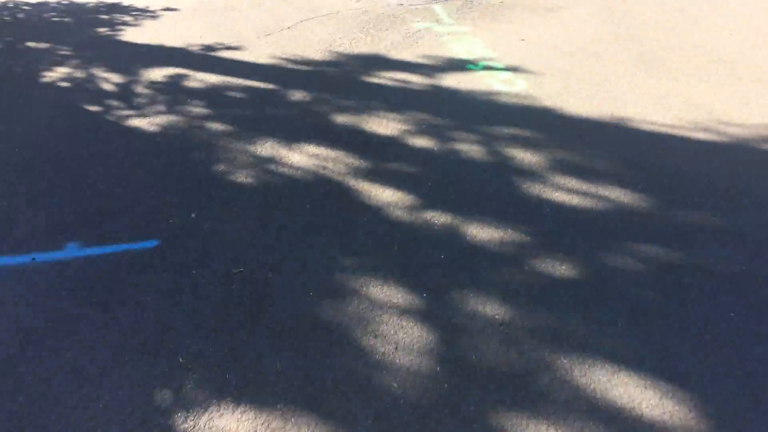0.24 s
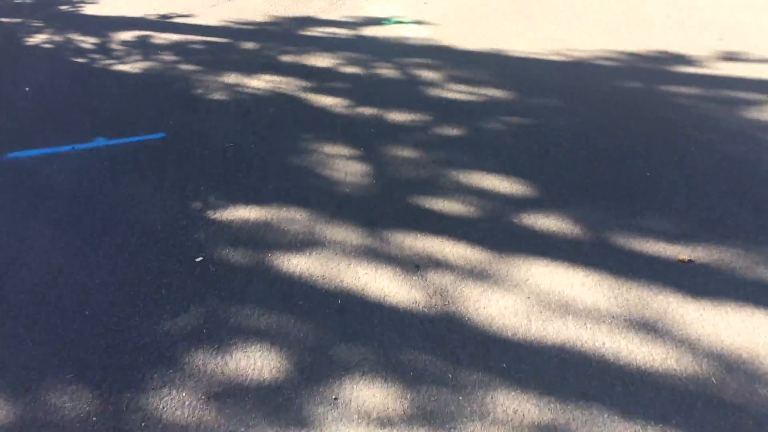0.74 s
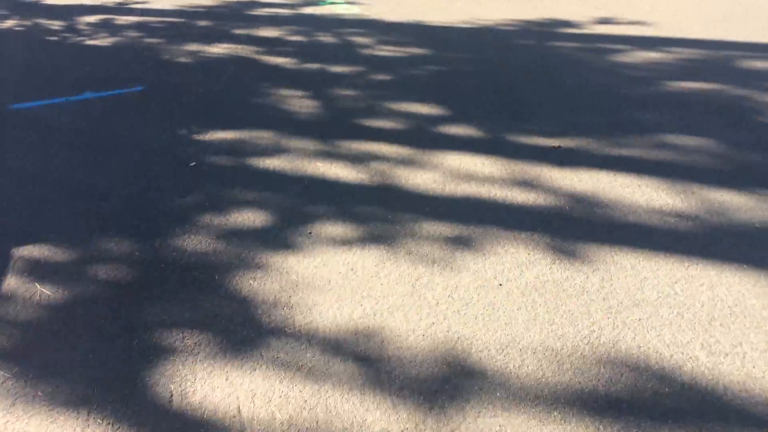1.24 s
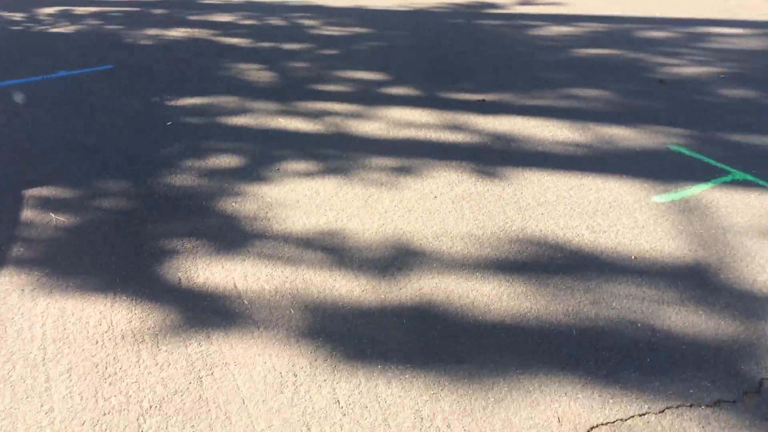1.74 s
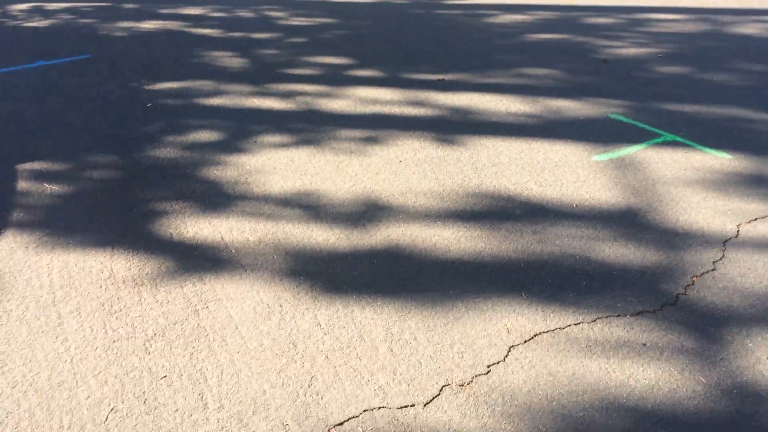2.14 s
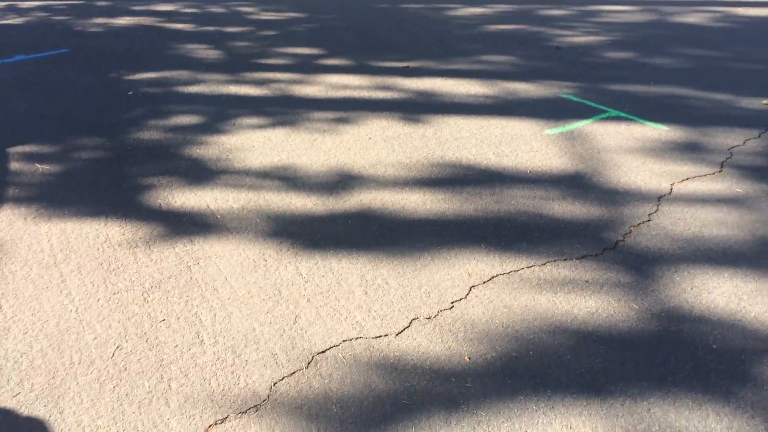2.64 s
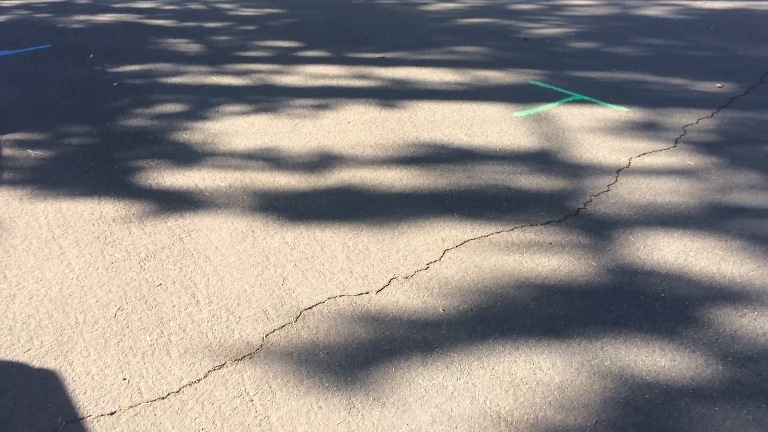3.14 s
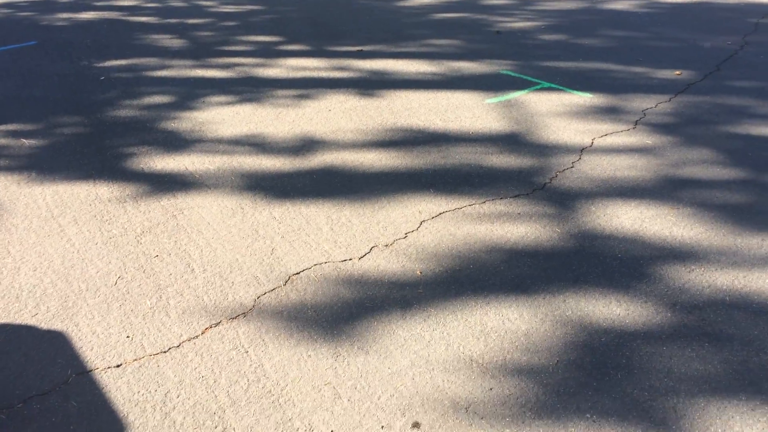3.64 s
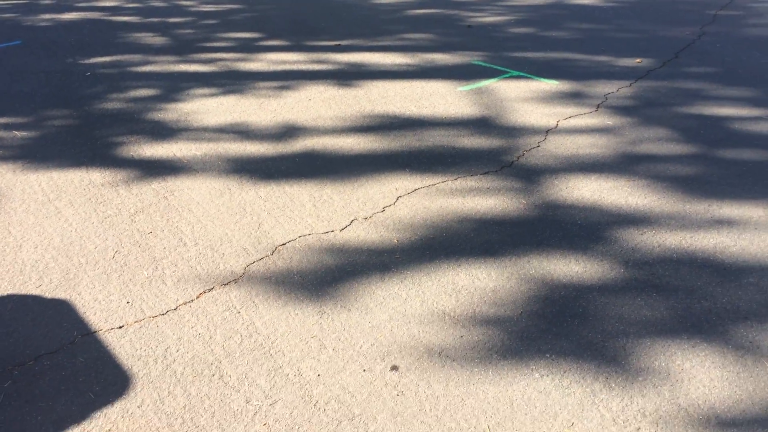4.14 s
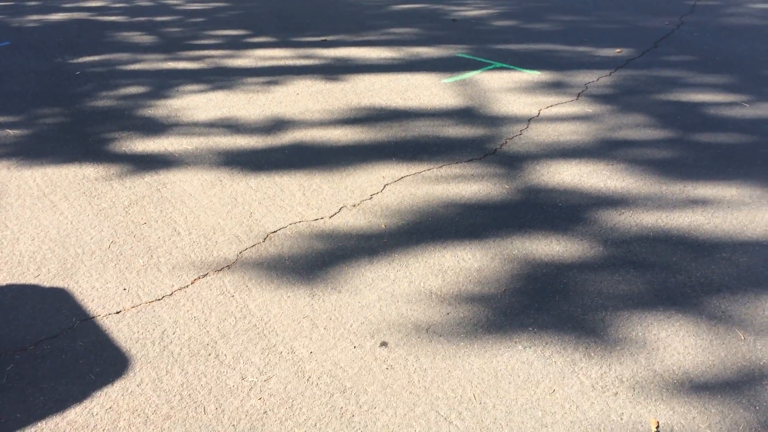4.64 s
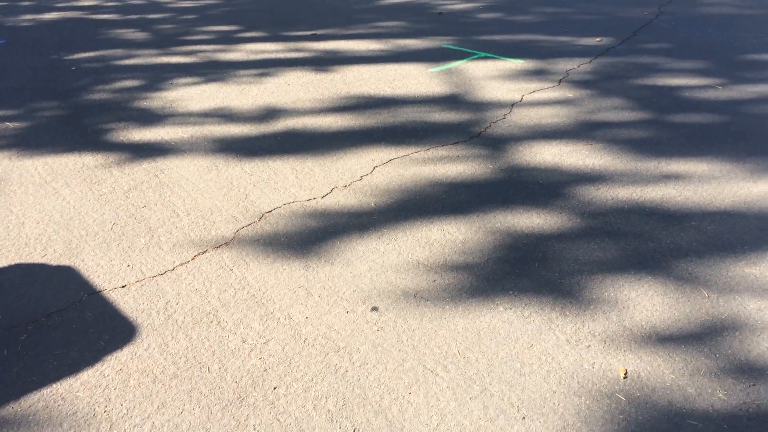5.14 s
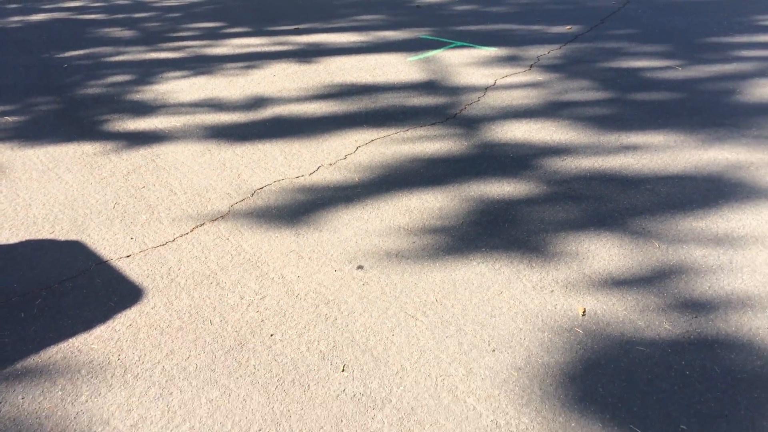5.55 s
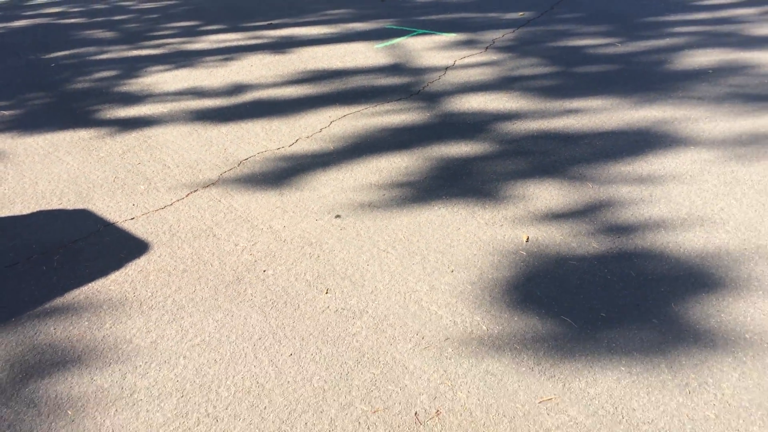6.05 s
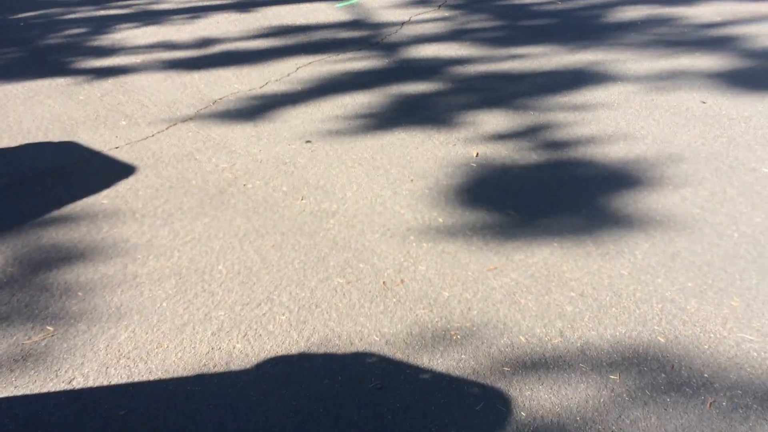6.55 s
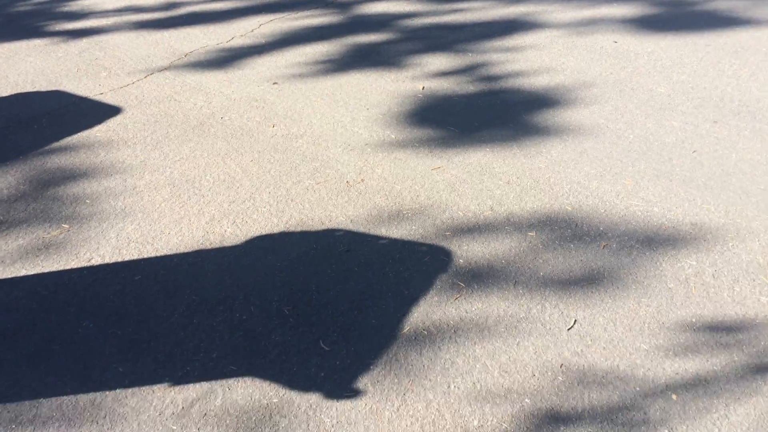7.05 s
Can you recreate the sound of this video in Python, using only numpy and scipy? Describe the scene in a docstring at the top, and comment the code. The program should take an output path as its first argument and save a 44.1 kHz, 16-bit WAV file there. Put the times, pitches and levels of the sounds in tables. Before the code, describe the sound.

A lumpy, boomy exhaust idle fills the foreground, individual firings audible and some weak, over soft engine-bay rush, hiss and distant low rumble. The car pulls away around three seconds, the note jumping up to a resonant drone, wavering, peaking, then falling back. Grit ticks and a dull panel knock come near the slow point before the revs rise at the end. Close mono outdoor pickup, little sense of echo.

```python
"""Street: a small four-cylinder car with a loud exhaust, heard close behind, idles lumpily, then pulls away;
its revs surge and fall, then climb again at the end.
Each firing sends a thump through the silencer, a sharp edge that rings the tailpipe and a puff of rasp;
weak firings make it stumble. The engine bay is shaped noise, gears, accessories and blower are wavering
tones, grit is short noise bursts and bodywork knocks are decaying sines."""
import sys
import numpy as np
from scipy import signal
from scipy.fft import rfft, irfft, next_fast_len
from scipy.io import wavfile
from scipy.ndimage import uniform_filter1d, map_coordinates

SR = 44100
rng = np.random.default_rng(int(sys.argv[2]) if len(sys.argv) > 2 else 0)


def persist_wave(psi):
    """Save psi, clipped to +-1, as 16-bit WAV."""
    counts = np.round(np.clip(psi, -1, 1) * 32767).astype(np.int16)
    wavfile.write(sys.argv[1], SR, np.atleast_2d(counts).T)


def natural_amplitude(level_db):
    """Convert a level in decibels to a linear amplitude factor, elementwise."""
    exponent = np.asarray(level_db, float) / 20
    return 10 ** exponent


N = 321048
T = np.arange(N) / SR


def unit(x):
    """Scales to rms 1."""
    return x / np.sqrt(np.mean(x ** 2))


def curves(rows):
    """Draws one value per sample for each column after the time."""
    times, *columns = np.transpose(rows)
    return [np.interp(T, times, column) for column in columns]


def wobble(rate):
    """A smooth random curve with rate knots per second."""
    knots = rng.standard_normal(int(N * rate / SR) + 4)
    return map_coordinates(knots, [T * rate])


def filtered(x, response):
    """Applies a complex frequency response."""
    size = next_fast_len(N + SR // 2)
    return irfft(rfft(x, size) * response(np.fft.rfftfreq(size, 1 / SR)), size)[:N]


def coloured(x, spectrum):
    """EQs a sound through (f/Hz, level/dB) points, then scales it to rms 1."""
    hz, db = np.transpose(spectrum)
    return unit(filtered(x, lambda f: natural_amplitude(np.interp(np.log(f + 1), np.log(hz), db))))


def patchy(depth_db):
    """White noise with random patches of gain in time and frequency."""
    bins = signal.stft(rng.standard_normal(N), nperseg=512)[2]
    field = uniform_filter1d(rng.standard_normal(bins.shape), 4, axis=0)
    field = uniform_filter1d(field, 10, axis=1)
    return signal.istft(bins * natural_amplitude(depth_db * unit(field)), nperseg=512)[1][:N]


def whine(hz, db, wander_hz, flutter_db, flutter_rate):
    """A sine that wavers in pitch and strength."""
    wavering_hz = hz + wander_hz * wobble(flutter_rate * 2)
    phase = 2 * np.pi * np.cumsum(wavering_hz) / SR
    return np.sqrt(2) * natural_amplitude(db + flutter_db * wobble(flutter_rate)) * np.sin(phase)


def resonance(f, centre, width):
    """Band-pass response of one pipe mode, 1 at its centre (all in Hz)."""
    return 1j * f * width / (centre ** 2 - f ** 2 + 1j * f * width)


# crankshaft speed: t/s, f/Hz (firings per second)
CRANKSHAFT = [(0.0, 25.35), (1.06, 27.53), (1.25, 26.61), (1.67, 27.08), (2.48, 26.58), (3.08, 28.27),
              (3.22, 31.08), (3.36, 38.86), (3.56, 40.14), (3.7, 48.88), (4.14, 48.46), (4.52, 42.54),
              (4.76, 48.17), (4.92, 46.06), (5.18, 57.31), (5.4, 58.03), (5.52, 51.28), (5.74, 42.95),
              (6.52, 25.72), (6.72, 23.85), (6.98, 27.28), (7.28, 39.47)]


def firing_rate():
    """The crankshaft sets how many firings come each second."""
    return curves(CRANKSHAFT)[0]


# combustion: t/s, level/dB of the slow push, level/dB of the quick ring
COMBUSTION = [(0, -20, -20), (.3, -18, -16.5), (1, -15.5, -13), (2.2, -16, -13.5), (3.05, -16, -16),
              (3.22, -13.5, -14.5), (3.3, -12, -11.5), (3.4, -7, -12), (3.58, -7, -16.5),
              (3.72, -13.5, -12.5), (4.15, -20, -9), (4.44, -18, -12.5), (4.57, -22.5, -17.5),
              (4.79, -16.5, -6), (5.04, -17, -13), (5.11, -14.5, -15), (5.15, -9, -11.5), (5.4, -12, -17.5),
              (5.6, -19.5, -9.5), (5.76, -22, -16), (5.95, -18.5, -13.5), (6.12, -25.5, -19),
              (6.3, -23.5, -20), (6.6, -14.5, -15.5), (6.9, -14.5, -14), (7.28, -9, -11)]


def combustion():
    """Each burn has a slow push, in the bass of its thump, and a quick ring above it."""
    return curves(COMBUSTION)


def effort(idle_db, per_push_db, per_doubling_db):
    """A level in dB that follows the push of the firings and engine speed, from 27 firings/s and -16 dB."""
    push_db, _ = combustion()
    return idle_db + per_push_db * (push_db + 16) + per_doubling_db * np.log2(firing_rate() / 27)


# runs of uneven, mostly weak firings: t/s, length/s, level/dB change
STUMBLES = [(.07, .039, -8.5), (.186, .078, -3), (.381, .077, -4), (.796, .11, -2), (1.015, .036, -8.5),
            (1.125, .074, -5), (1.349, .149, -6.5), (1.573, .074, -3), (1.757, .037, -6.5),
            (1.868, .037, -3), (2.129, .112, -6.5), (2.466, .149, -4.5), (2.689, .037, -7),
            (2.799, .036, -4.7), (2.872, .072, -8.5), (3.015, .035, -4), (3.121, .131, -7.5),
            (3.31, .027, -7.5), (3.389, .026, -8.5), (3.491, .075, -0.5), (3.613, .067, -10.5),
            (3.721, .02, -7.5), (4.069, .021, -4), (4.527, .157, -5), (4.917, .022, -15), (5.06, .075, 1),
            (5.222, .087, -6.5), (5.378, .017, -10.5), (5.467, .056, -2), (5.625, .021, -3),
            (5.932, .052, -14.5), (6.561, .121, -9), (6.845, .039, -6), (7.185, .028, -9)]


def firings():
    """Fires once per cycle of the firing rate; strength varies at random and drops in the stumbles."""
    cycles = np.cumsum(firing_rate()) / SR - .3045  # first firing falls .3045 cycles in
    fire = np.interp(np.arange(int(cycles[-1]) + 1), cycles, T)
    strength_db = sum(db * ((fire > s) & (fire < s + length)) for s, length, db in STUMBLES)
    strength_db += .8 * rng.standard_normal(len(fire))
    jitter = .0001 * rng.standard_normal(len(fire))  # s
    at = np.clip(np.round((fire + jitter) * SR).astype(int), 0, N - 1)
    return fire, at, strength_db


# exhaust pipe and silencer modes: f/Hz, width/Hz, level/dB, signed factor
PIPE = [(44.74, 7.46, -13.5, -1.147), (85.8, 5.8, -7, 0.35), (112.18, 15, 2, 0.9),
        (155.6, 16.2, -5.5, -0.67), (173.6, 15.2, 5.5, -0.79), (208, 19.2, 6, 0.71)]


def silencer(f, blowdown_hz=69, lead_s=0.01163):
    """A slow blowdown pulse rings the pipe; its trough, of depth about 1, is moved lead_s earlier."""
    ring = sum(sign * natural_amplitude(db) * resonance(f, hz, width) for hz, width, db, sign in PIPE)
    blowdown = 1 / (1 + 1j * f / blowdown_hz) ** 4
    return natural_amplitude(70.4) * ring * blowdown * np.exp(2j * np.pi * f * lead_s)


def thump(at, strength_db, burn_hz=140):
    """Each firing thumps through the silencer; a poor burn lacks mainly the slow part of the pulse."""
    push_db, ring_db = combustion()
    full, short = np.zeros((2, N))
    full[at] = natural_amplitude(ring_db[at])
    short[at] = full[at] * (natural_amplitude(strength_db + (push_db - ring_db)[at]) - 1)
    slow_part = filtered(short, lambda f: silencer(f) / (1 + (f / burn_hz) ** 6))
    return filtered(full, silencer) + slow_part


# tailpipe resonances rung by the edge: f/Hz, width/Hz, level/dB
TAILPIPE = [(238.6, 13.6, 13), (301.3, 14.8, 8.5), (335.3, 8.1, 8.5), (397, 27, 0), (491, 37, -4.5),
            (572.4, 14, -4), (661.5, 40, -7), (896, 73, -16.5), (1440, 130, -17.5)]


def tailpipe(f, modes, rise_hz=1200):
    """Neighbouring resonances ring in opposite sense; the edge takes a moment to rise."""
    ring = sum((-1) ** k * natural_amplitude(db) * resonance(f, hz, width) for k, (hz, width, db) in enumerate(modes))
    return ring / (1 + 1j * f / rise_hz) ** 2


def edge(at, strength_db):
    """A sharp pressure edge per firing rings the tailpipe; a harder edge wakes the upper resonances."""
    edge_db = effort(idle_db=-52.5, per_push_db=0.94, per_doubling_db=9.5)
    delay_s = .0001 * abs(rng.standard_normal(len(at)))
    gain_db = .6 * strength_db + 1.2 * rng.standard_normal(len(at))
    clicks = np.zeros(N)
    clicks[at + np.round(delay_s * SR).astype(int)] = natural_amplitude(gain_db) / np.sqrt(firing_rate()[at])
    clicks = np.roll(clicks, -round(0.002017 * SR))  # edges sit about 2 ms early
    low = filtered(clicks, lambda f: tailpipe(f, TAILPIPE[:4]))
    high = filtered(clicks, lambda f: tailpipe(f, TAILPIPE[4:]))
    steeper_db = 0.47 * np.clip(edge_db + 40, 0, None)
    return natural_amplitude(edge_db) * (low + natural_amplitude(steeper_db) * high) / low.std()


# colour of gas tearing out of the tailpipe: f/Hz, level/dB
RASP = [(240, -35.5), (400, -2), (487, -2.5), (594, -5), (745, -0.5), (994, -9.5), (1910, -17.5),
        (3150, -31.5), (3510, -22), (3840, -26.5), (15000, -42)]
# firings that bark out of the pipe: t/s, level/dB of extra rasp
BARKS = [(3.375, 11), (3.452, 7), (3.503, 6), (3.527, 5), (3.552, 3), (3.601, 8), (5.124, 3), (5.439, 7),
         (5.818, 8), (7.141, 4)]


def rasp(fire, at, strength_db):
    """Gas tears out in a puff of noise per firing, over a jet that never quite stops."""
    bark_db = sum(db * (abs(fire - s) < .007) for s, db in BARKS)
    puffs = np.zeros(N)
    puffs[at] = natural_amplitude(.8 * strength_db + bark_db + 1.4 * rng.standard_normal(len(at)))
    t = T[:SR // 20]
    puff_shape = t / .003 * np.exp(-t / .003)
    jet = signal.fftconvolve(puffs, puff_shape)[:N] + .12
    rasp_db = effort(idle_db=-65.5, per_push_db=1.67, per_doubling_db=1.1)
    return natural_amplitude(rasp_db) * coloured(unit(jet) * rng.standard_normal(N), RASP)


def engine():
    """Thump, edge and rasp share the same firings."""
    fire, at, strength_db = firings()
    return thump(at, strength_db) + edge(at, strength_db) + rasp(fire, at, strength_db)


# nearness of the engine bay: t/s, level/dB
NEARNESS = [(0, 6), (.7, 1), (1.5, -0.5), (2.9, -5), (3.9, -0.5), (4.7, 3.5), (6.3, 4), (7, -2.5)]
# rush at idle: f/Hz, level/dB
RUSH_IDLE = [(190, -6.5), (330, -1), (394, -0.5), (638, -8.5), (726, -15.5), (789, -7.5), (1160, -11),
             (1490, -10), (2070, -16.5), (2380, -13.5), (5500, -25.5), (7150, -45.5), (12100, -120)]
# rush under way: f/Hz, level/dB
RUSH_ROLLING = [(290, 1.5), (500, -5), (989, -13.5), (1180, -13), (1310, -13.5), (1550, -16), (2080, -21),
                (2540, -17.5), (3230, -20), (4190, -22), (5500, -32), (7150, -46.5), (12100, -120)]
# hiss: f/Hz, level/dB
HISS = [(2650, -11.5), (4500, 0), (5340, -17.5), (6220, -3.5), (6840, -6.5), (8040, -10), (9170, -9),
        (11700, -13), (13500, -9), (15000, -11)]
# far traffic and breeze: f/Hz, level/dB
RUMBLE = [(8, -6.5), (20, -2.5), (35, -27), (65, 1.5), (120, -1.5), (250, -15), (400, -72)]


def engine_bay():
    """Fans, belts and tyres: a low rush that changes colour under way, a flickering hiss, a far rumble."""
    near_db, = curves(NEARNESS)
    rush_db = effort(idle_db=-57, per_push_db=0.13, per_doubling_db=0.7) + 0.38 * near_db
    rush_db += 0.67 * wobble(7.9)
    hiss_db = effort(idle_db=-70, per_push_db=0.36, per_doubling_db=2.25) + near_db
    hiss_db += 0.35 * wobble(11) + 0.5 * wobble(40)
    rolling = np.interp(T, [3.4, 3.7, 6.3, 6.6], [0, 1, 1, 0])  # gets under way, comes to rest
    air = patchy(depth_db=1.5)
    rush = (1 - rolling) * coloured(air, RUSH_IDLE) + rolling * natural_amplitude(5) * coloured(air, RUSH_ROLLING)
    hiss = coloured(patchy(depth_db=2.0), HISS)
    rumble = coloured(rng.standard_normal(N), RUMBLE)
    return natural_amplitude(rush_db) * rush + natural_amplitude(hiss_db) * hiss + natural_amplitude(-37.5) * rumble


# wavering gear whine during the idle, up to pulling away: t/s, f/Hz, level/dB
GEAR = [(0, 700, -78), (.7, 715, -62), (.95, 735, -66), (1.3, 722, -62), (2.4, 722, -68), (2.75, 738, -60),
        (2.95, 722, -62), (3.15, 695, -68), (3.4, 690, -85)]


def gears():
    """Gear teeth sing as one wavering tone."""
    return whine(*curves(GEAR), wander_hz=3, flutter_db=5, flutter_rate=6)


# accessory tones, before their shared fade: f/Hz, level/dB
ACCESSORIES = [(508, -69), (1510, -71.5), (2170, -76), (2350, -76)]


def accessories():
    """Accessories hum on steady pitches until the car pulls away."""
    fade_db = np.interp(T, [0, .7, 3.2, 3.4], [-6, -2.0, -3.7, -28])
    return sum(whine(hz + 0 * T, db + fade_db, wander_hz=6, flutter_db=3.5, flutter_rate=9)
               for hz, db in ACCESSORIES)


# scuffs and ticks of grit: t/s, level/dB, lowest f/Hz, highest f/Hz, length/s
GRIT = [(.332, -62.5, 4500, 13600, 0.034), (.33, -56, 1500, 3140, 0.042), (6.49, -61, 3880, 15100, 0.021),
        (6.491, -54, 1450, 2500, 0.028), (6.615, -62, 5500, 11000, 0.0042), (6.644, -63, 5500, 9830, 0.002),
        (6.68, -64, 5500, 10000, 0.0048), (6.718, -63, 5500, 11100, .005)]


def grit():
    """Grit scrapes in short band-passed noise bursts that swell and fade."""
    out = np.zeros(N)
    for s, db, low_hz, high_hz, length in GRIT:
        band = signal.butter(2, [low_hz, high_hz], "band", fs=SR, output="sos")
        burst = signal.sosfilt(band, rng.standard_normal(4096))
        swell = np.sin(np.pi * np.clip(T[:4096] / length, 0, 1))
        out[round(s * SR):][:4096] += natural_amplitude(db) * unit(burst) * swell
    return out


# knocks of the bodywork: t/s, level/dB, f/Hz, 60 dB decay/s
KNOCKS = [(1.335, -48, 780, .08), (1.704, -45, 680, .04), (6.542, -41, 1020, .025), (6.752, -22, 430, .014),
          (6.754, -34, 850, .012), (6.756, -50, 1380, .08), (6.975, -34, 400, .03)]


def knocks():
    """Panels knock and ring briefly as decaying sines with a soft 1 ms onset."""
    out = np.zeros(N)
    t = T[:4096]
    for s, db, hz, t60 in KNOCKS:
        ring = natural_amplitude(db - 60 * t / t60) * np.sin(2 * np.pi * hz * t)
        out[round(s * SR):][:4096] += ring * (1 - np.exp(-t / .001))
    return out


def whistle(rows, wander_hz, count, spread):
    """Several close, breathy strands along one pitch curve."""
    hz, db = curves(rows)
    strands = sum(whine(hz * (1 + spread * wobble(4)), db, wander_hz, flutter_db=1.5, flutter_rate=57)
                  for _ in range(count))
    sounding = (T > rows[0][0]) * (T < rows[-1][0])
    return strands / np.sqrt(count) * sounding


# wavering blower whistle near 2.6 kHz: t/s, f/Hz, level/dB
BLOWER = [(3.55, 2560, -78), (3.8, 2800, -74), (4.25, 2740, -72), (4.52, 2550, -63), (4.8, 2760, -66),
          (5, 2570, -67), (5.55, 2590, -68), (5.65, 2720, -67), (5.9, 2500, -68), (6.25, 2700, -70),
          (6.6, 2600, -85)]
# upper, breathier strand of the whistle: t/s, f/Hz, level/dB
UPPER_STRAND = [(3.6, 4300, -85), (3.75, 4300, -72), (4.4, 4020, -69), (4.8, 4200, -71), (5.15, 3650, -69),
                (5.88, 4500, -70), (6.27, 3800, -69), (6.5, 3700, -85)]


def blower():
    """A blower whistles waveringly near 2.6 kHz, with a breathier upper strand."""
    lower = whistle(BLOWER, wander_hz=55, count=3, spread=.012)
    return lower + whistle(UPPER_STRAND, wander_hz=80, count=4, spread=.03)


def scene():
    """Mixes all sources to mono."""
    mix = engine() + engine_bay() + gears() + accessories() + grit() + knocks() + blower()
    return mix[None]


def low_pass(x):
    """Removes everything above the highest recorded frequency."""
    return signal.sosfilt(signal.butter(12, 15200, fs=SR, output="sos"), x)


def record(dry):
    """Delivers the finished mix."""
    return low_pass(dry)


dry = scene()
out = record(dry)
persist_wave(out)
```